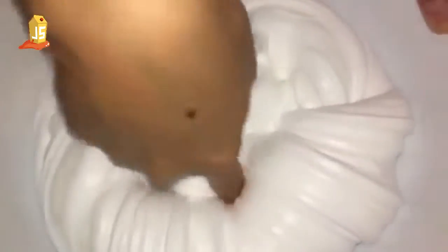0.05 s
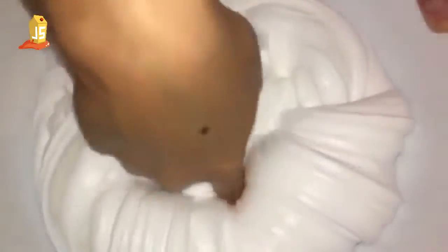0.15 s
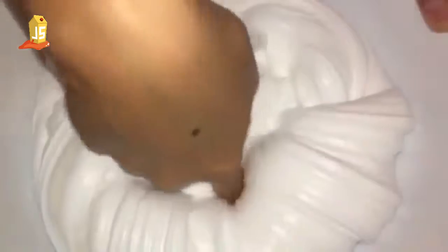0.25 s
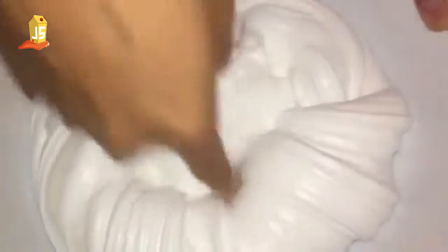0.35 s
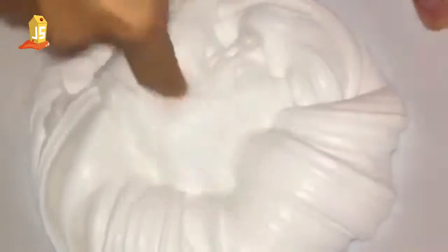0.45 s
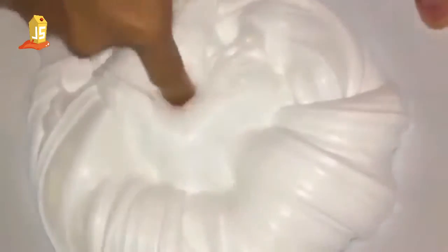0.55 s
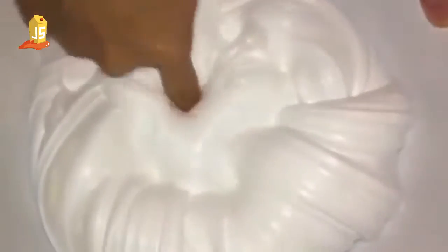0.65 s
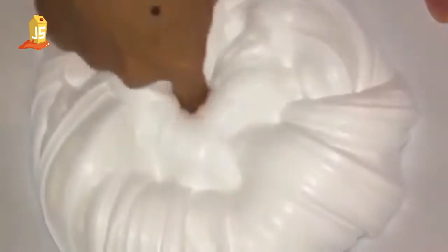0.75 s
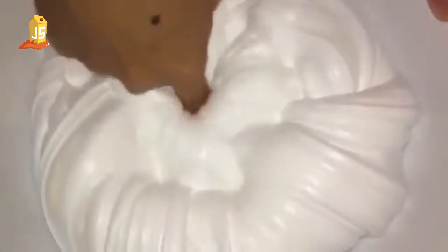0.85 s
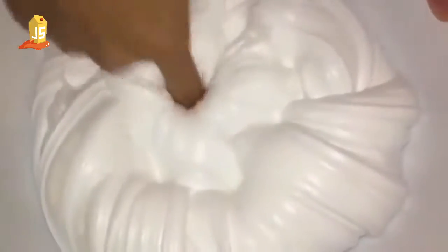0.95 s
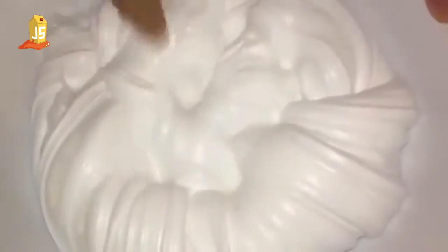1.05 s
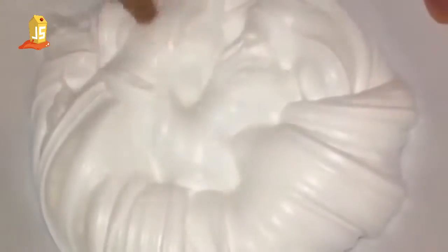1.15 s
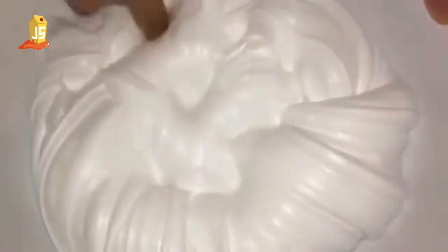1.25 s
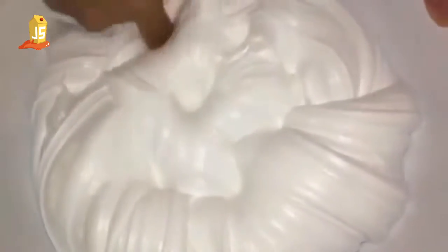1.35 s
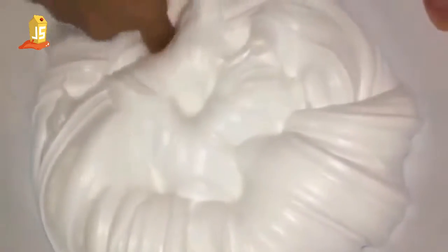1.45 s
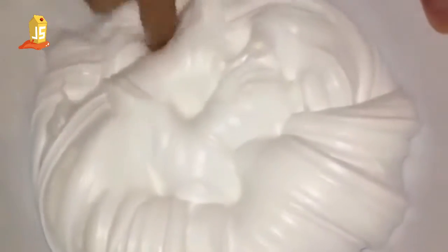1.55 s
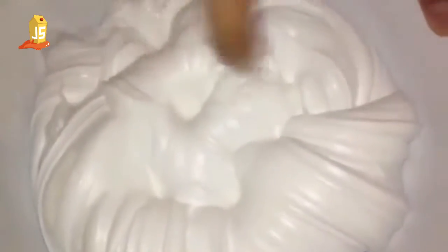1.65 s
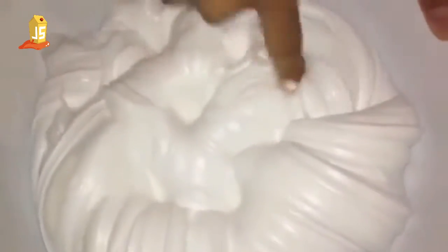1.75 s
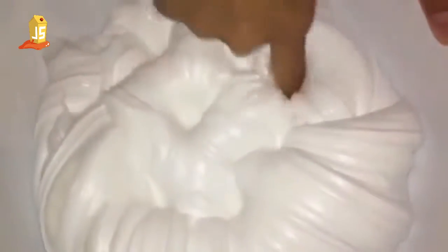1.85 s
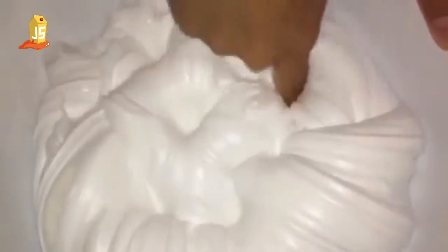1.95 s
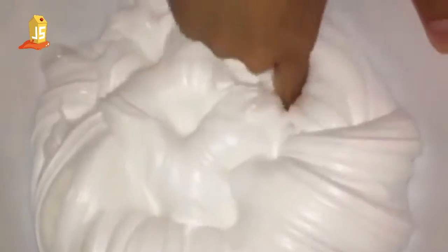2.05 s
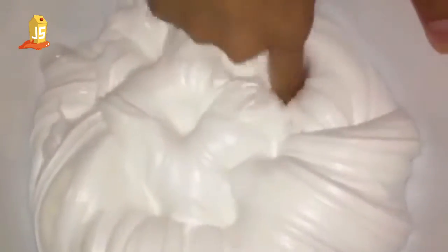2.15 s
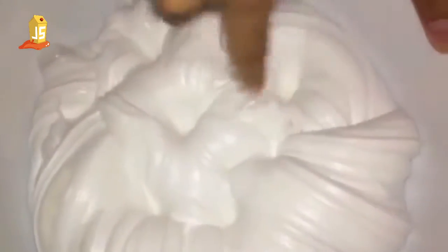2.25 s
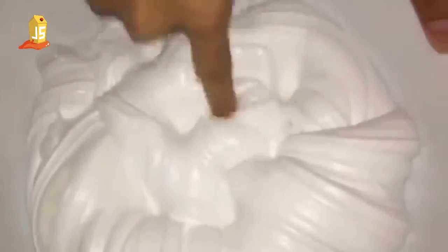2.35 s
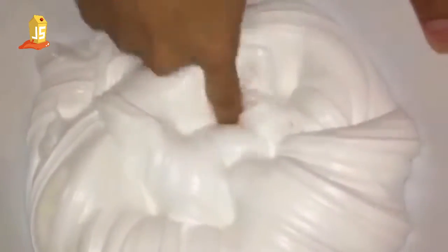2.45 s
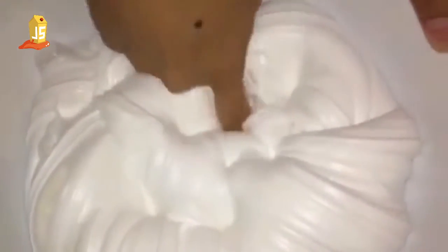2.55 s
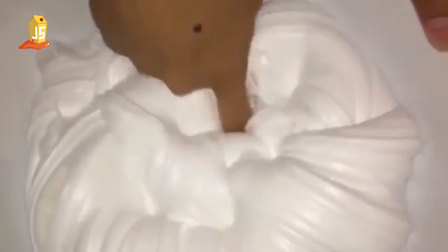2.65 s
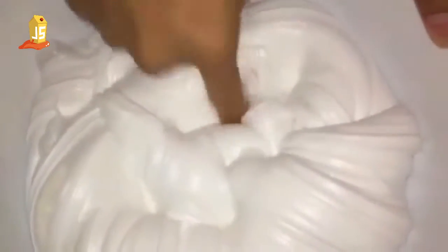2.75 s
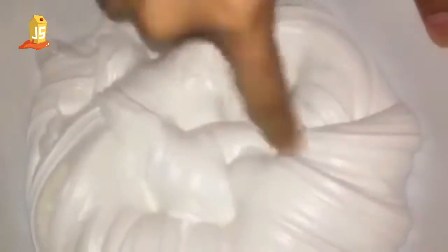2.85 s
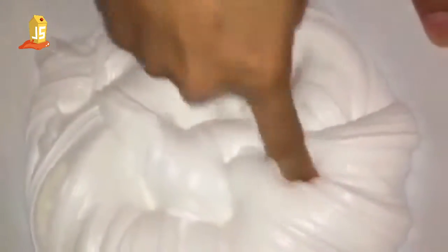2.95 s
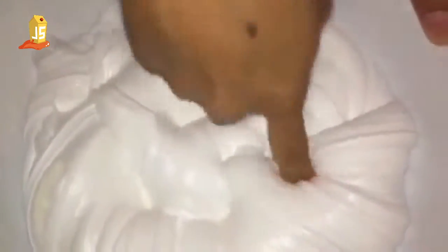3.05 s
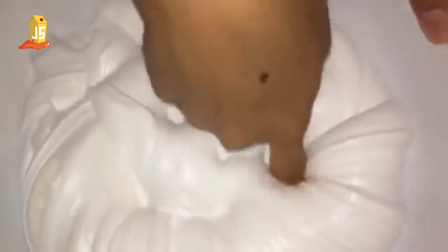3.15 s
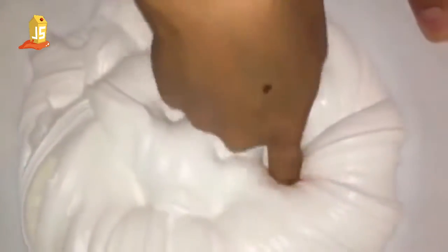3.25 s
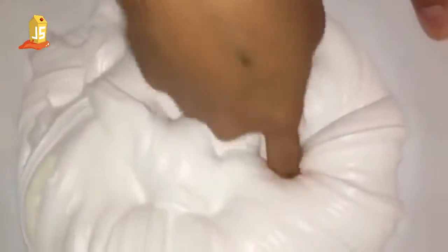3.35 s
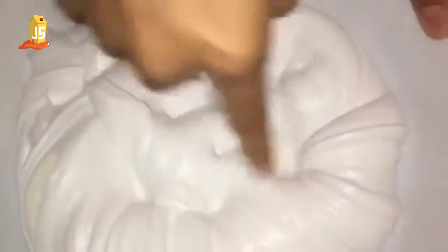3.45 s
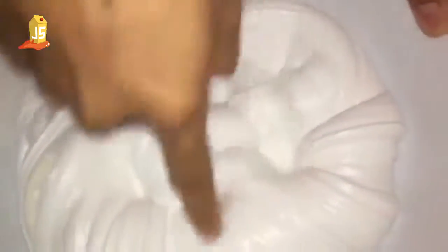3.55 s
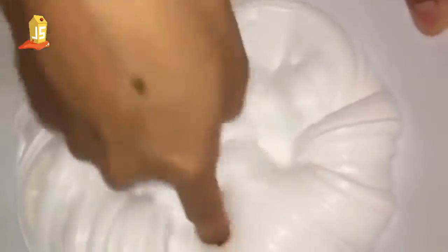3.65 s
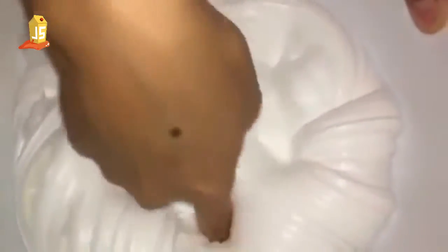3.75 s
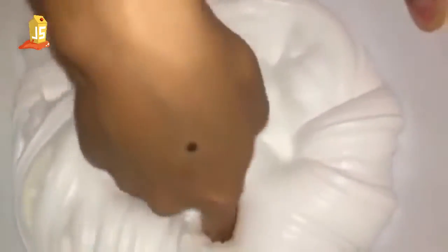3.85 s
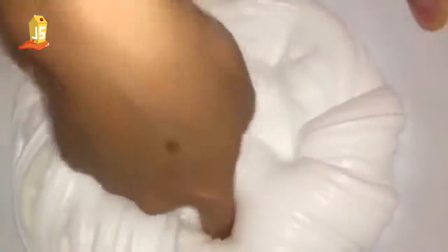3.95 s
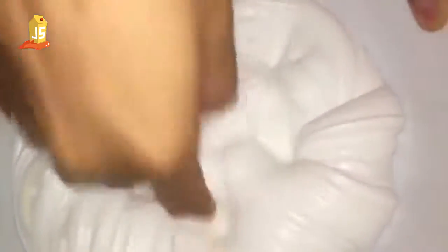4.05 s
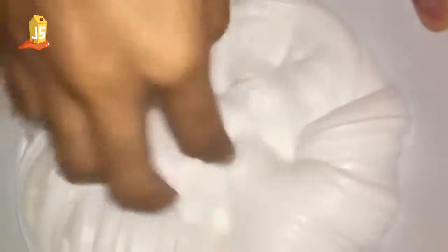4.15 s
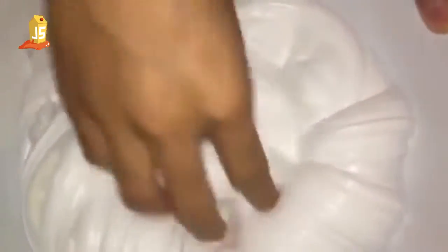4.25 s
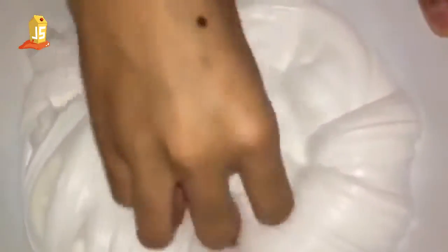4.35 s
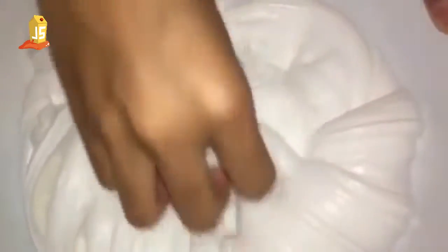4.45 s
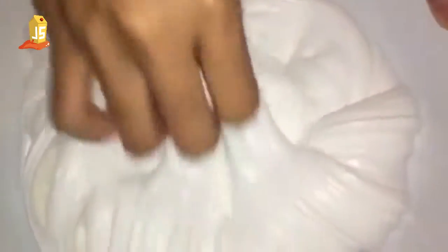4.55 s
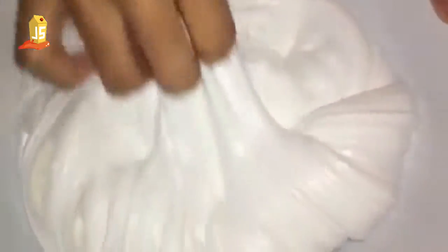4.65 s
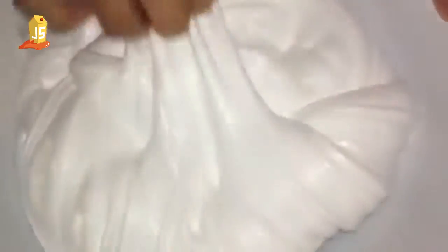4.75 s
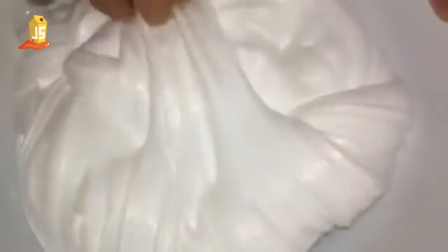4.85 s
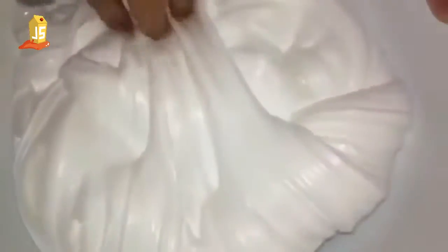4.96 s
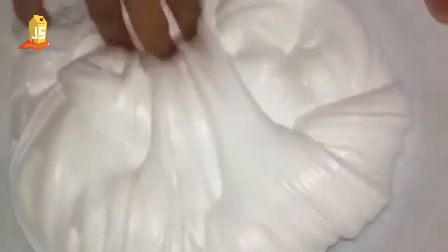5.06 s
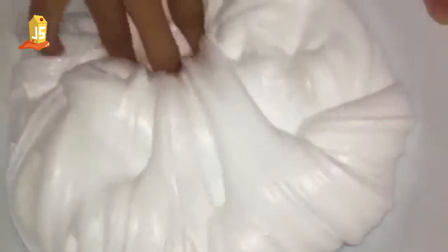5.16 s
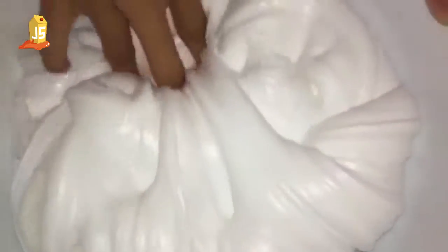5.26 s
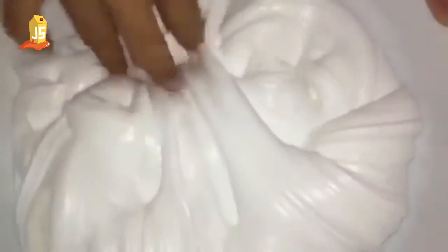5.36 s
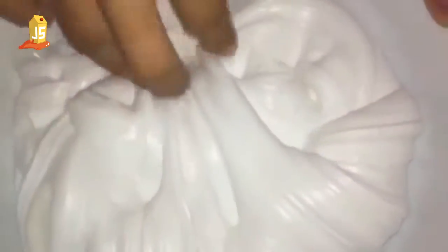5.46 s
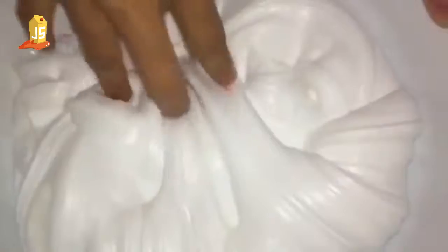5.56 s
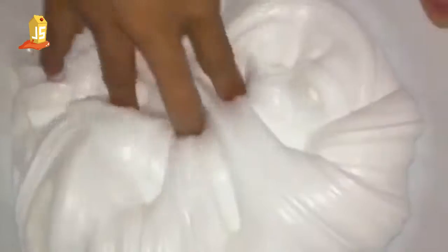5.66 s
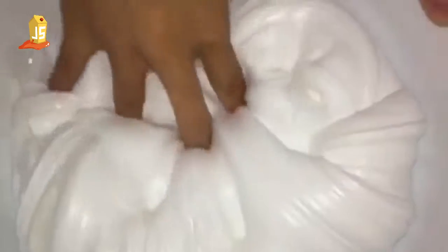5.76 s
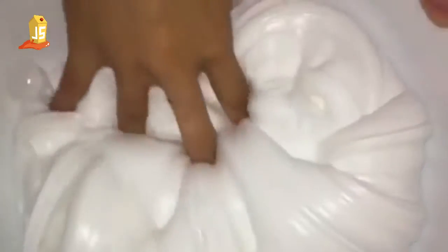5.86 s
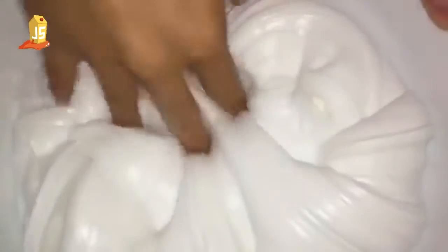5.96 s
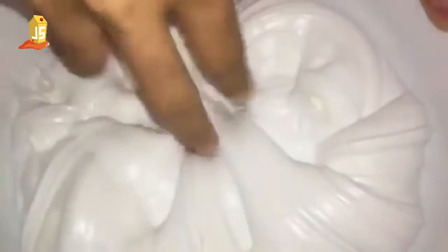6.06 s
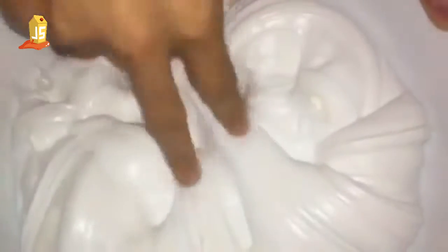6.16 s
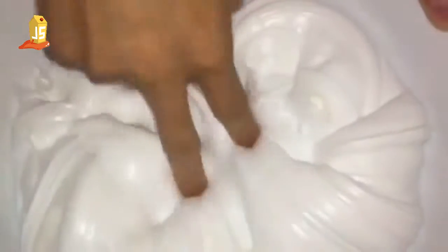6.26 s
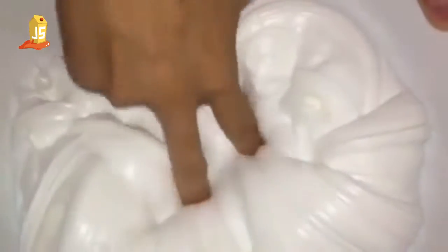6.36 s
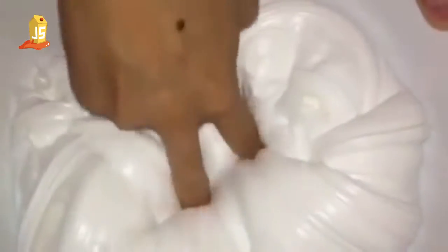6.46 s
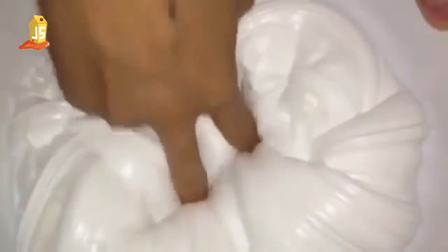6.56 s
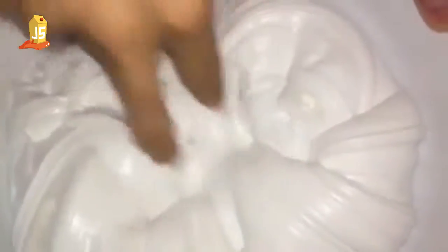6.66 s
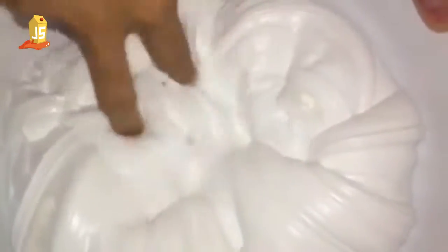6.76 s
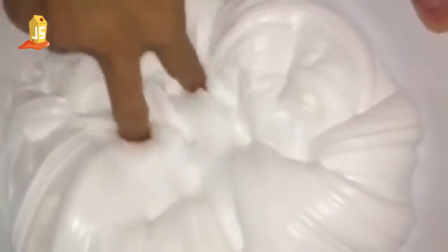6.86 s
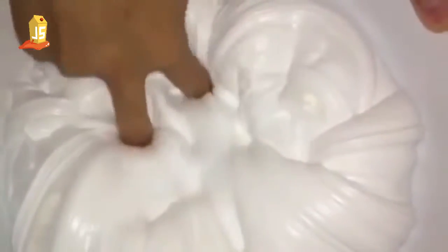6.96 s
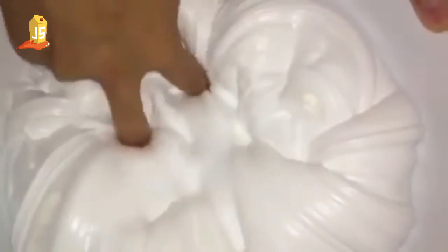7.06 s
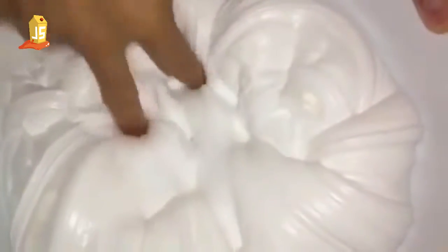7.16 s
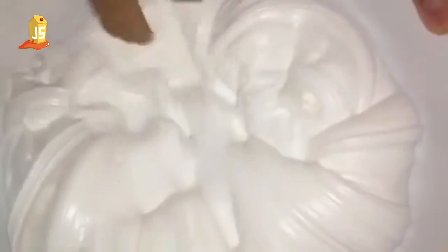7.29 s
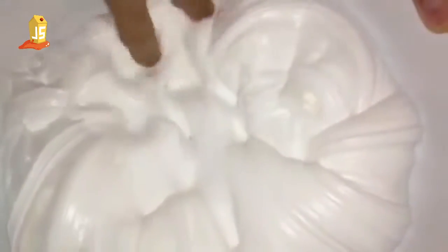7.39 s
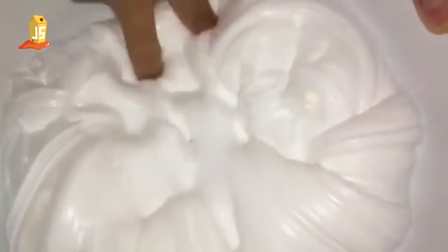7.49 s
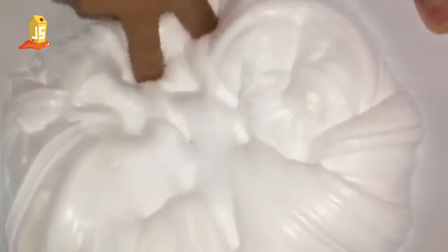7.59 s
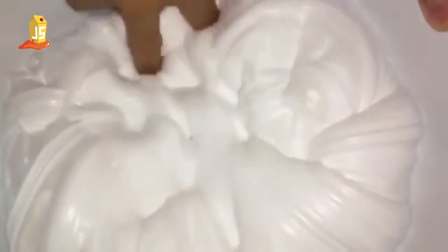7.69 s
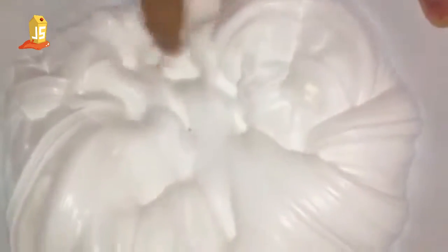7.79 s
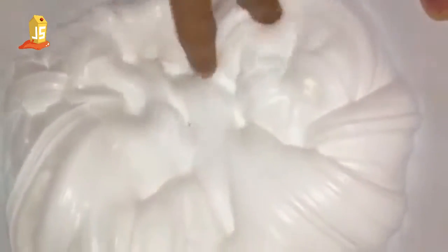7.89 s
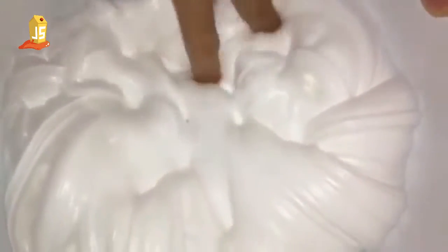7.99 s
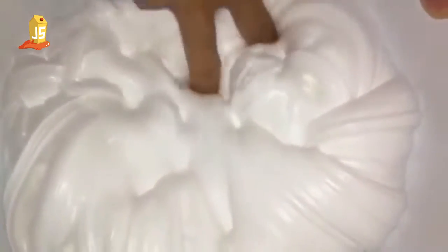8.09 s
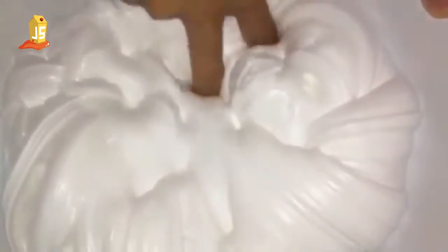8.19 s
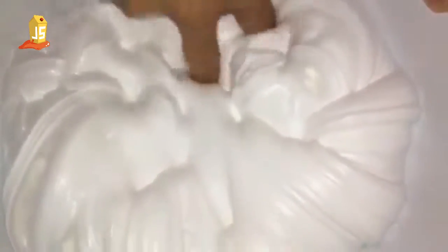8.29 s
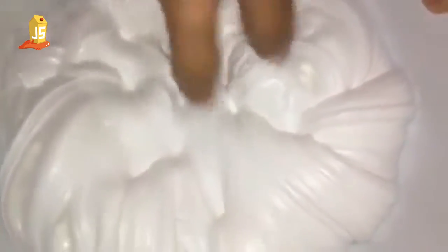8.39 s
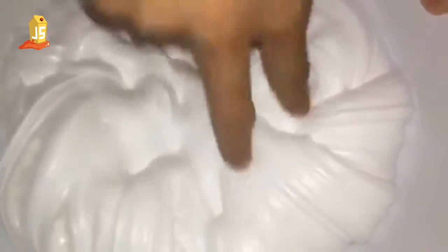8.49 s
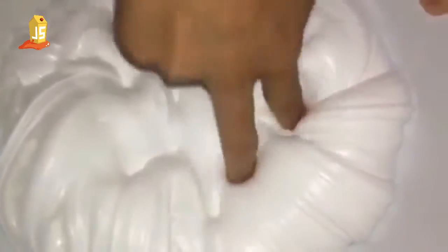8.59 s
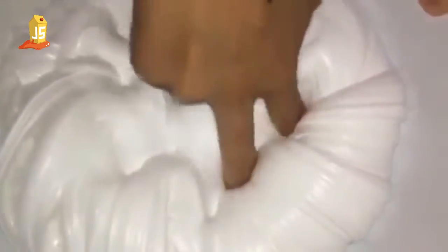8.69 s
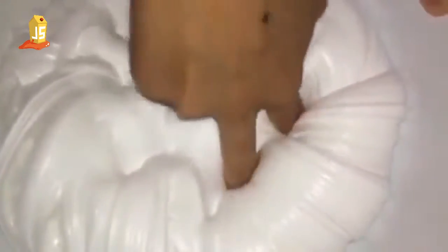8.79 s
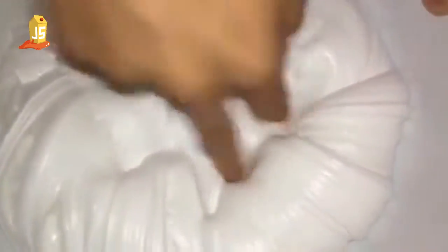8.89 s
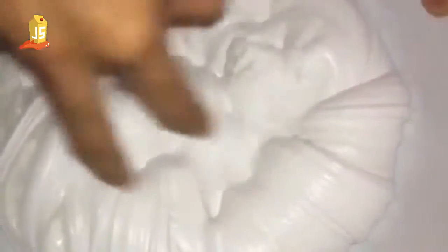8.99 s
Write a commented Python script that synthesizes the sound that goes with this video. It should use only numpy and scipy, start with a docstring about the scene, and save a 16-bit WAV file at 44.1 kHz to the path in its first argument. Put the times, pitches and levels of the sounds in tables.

```python
"""A faint squeak of three short notes comes first, over a motor hum; then fingers poke fluffy slime.
Indoors, the slime sits in a plastic bowl close to a phone microphone, the hum behind it.
Each poke tears the foam: noise bursts crack, thousands of clicks a second fizz,
sagging near-sine tones plop and low ones thump the bowl, which echoes and rings.
Between pokes the fingers drag the slime along the bowl: dense slips ring the resonances of its fold."""
import sys
import numpy as np
from scipy import signal
from scipy.fft import rfft, irfft, next_fast_len
from scipy.io import wavfile
from scipy.ndimage import uniform_filter1d

SR = 44100
rng = np.random.default_rng(int(sys.argv[2]) if len(sys.argv) > 2 else 0)


def dump_mix(stems):
    """Bounce the given channels to the path in sys.argv[1] as a 16-bit WAV at rate SR."""
    frames = np.atleast_2d(stems).T  # one column per channel
    limited = np.clip(frames, -1, 1)  # hard clip at full scale
    pcm = np.round(limited * 32767).astype(np.int16)
    wavfile.write(sys.argv[1], SR, pcm)


def ratio_of_db(decibels):
    """Turn decibels (scalar or array-like) into linear amplitude factors; 0 dB maps to 1."""
    return 10 ** (np.asarray(decibels, float) / 20)


N = 398201  # samples

# skins of slime snapping: (peak time [s], peak level [dB], colour [Hz], length [ms])
CRACKS = [(0.118, -39, 6460, 1.2), (0.399, -29, 5900, 4.1), (1.0336, -0.5, 3570, 0.71),
          (1.585, -24, 1720, 1.2), (1.602, -20, 2210, 3.4), (1.608, -7, 4540, 0.91),
          (1.6116, -8.5, 4850, 1.7), (1.8086, -52, 3190, 0.95), (1.831, -49, 2970, 1.1),
          (1.926, -33, 2650, 0.54), (2.107, -42.5, 1820, 3.5), (2.2318, -11, 2900, 0.43),
          (2.4477, -47.5, 3300, 0.83), (2.464, -47.5, 5500, 0.91), (2.476, -49, 3530, 1.2),
          (2.5248, -13, 3960, 0.2), (2.5502, -27, 3600, 0.77), (2.5566, -26, 3330, 0.37),
          (2.626, -39.5, 7220, 0.35), (2.8139, -3, 3310, 1.14), (2.829, -23.5, 3550, 1.8),
          (3.328, -47.5, 2400, 1.1), (3.345, -46.5, 2370, 1.1), (3.4083, -30, 1950, 2),
          (3.43, -38, 9100, 1), (3.449, -5.5, 4020, 0.6), (4.0598, -1.5, 5850, 0.27),
          (4.335, -38.5, 6610, 0.33), (4.3605, -42.5, 6320, .7), (4.44, -51, 4950, 1.3),
          (4.475, -34.5, 10370, 0.44), (4.484, -39, 6680, 2.8), (4.506, -39, 6280, 2.9),
          (4.57, -43, 3470, 1.9), (4.7573, -34, 1700, 1.2), (4.9227, -34.5, 2260, 3.1),
          (4.996, -51, 3520, 1.5), (5.045, -40.5, 11280, 1.5), (5.3952, -8, 3840, 0.76),
          (5.408, -22, 3930, 3.3), (5.4242, -3, 6220, 0.87), (5.6943, -24, 6400, 0.83),
          (5.7409, -37, 11900, 0.58), (5.8874, -24.5, 1850, 1.16), (6.0102, -20, 2070, 1.7),
          (6.0203, -18.5, 4300, 1.5), (6.040, -14.5, 2914, 2), (6.0398, -3, 6040, 1.56),
          (6.2466, -38.5, 5550, 1), (6.258, -45.5, 3200, 1.5), (6.3376, -49, 4020, 1),
          (6.6378, -25, 1850, 1.5), (6.652, -18.5, 1997, 3.7), (6.66, -8.5, 4300, 2.8),
          (7.0327, -14, 5720, 0.39), (7.191, -28, 2400, 3), (7.2017, -23.5, 2300, 4.2),
          (7.2133, -17, 3580, 1), (7.2246, -13, 5770, 0.58), (7.23, -19, 5590, 1.9), (7.2398, -9, 5040, .7),
          (7.2446, -14.5, 4570, 0.97), (7.397, -43, 11860, 0.55), (7.443, -49, 5200, 1.3),
          (7.4596, -34, 1750, 1.2), (7.648, -31, 2010, 1.5), (7.705, -47.5, 6300, .8),
          (7.741, -22.5, 1730, 3.1), (7.7682, -19, 1770, 1.5), (7.777, -12, 4790, 2.9),
          (7.7838, -9.5, 5080, 1.1), (7.929, -47, 10000, 1.2), (8.0523, -39.5, 11220, 0.73),
          (8.35, -14.5, 5630, 1.7), (8.361, -16, 3570, 4.2), (8.6604, -28.5, 2050, 1.2),
          (8.6908, -35, 7600, 0.76), (8.7245, -47, 7000, 1.5), (8.932, -26, 2160, 3.4),
          (8.948, -22.5, 2130, 6.2)]
# spectrum of the spit of noise in a snap: (frequency [Hz], relative level [dB])
SNAP_COLOUR = [(410, -45), (700, 12.5), (2630, -11.5), (3330, -6), (4400, -13), (6460, -7.5), (7750, -15.5),
               (9000, -8.5), (11700, -36.5), (19800, -120)]


def cracks():
    """A spit of noise leaning to the colour of the torn skin, a short ring there, and a thin top sizzle."""
    out = np.zeros(N)
    spit = coloured(rng.standard_normal(N + SR), SNAP_COLOUR)
    treble = signal.butter(4, 8000, "high", fs=SR, output="sos")
    sizzle = evened(signal.sosfilt(treble, rng.standard_normal(N + SR)))

    def wave(at, t, hz):
        # the sizzle of a 4 kHz snap is at -15 dB and grows 18 dB per octave of colour
        top_db = -15 + 18 * np.log2(hz / 4000)
        noise = signal.lfilter(*signal.butter(1, 0.18 * hz, "high", fs=SR), spit[at:at + len(t)])
        body = 0.7 * ratio_of_db(0.5 * top_db) * noise  # the brighter the snap, the broader its spit
        body += 0.666 * resonate_twice(noise, hz, 0.71 * hz)
        body += 0.48 * evened(resonate(noise, hz, 0.15 * hz))
        return evened(body) + ratio_of_db(top_db) * sizzle[at:at + len(t)]

    for row in CRACKS:
        add(out, row, wave, bend=0.82, rise=0.46)
    return out


# fingers pressing or pulling the foam:
# (time of most pressure [s], fizz level [dB], time since touch [ms], level at touch [dB], time to fall 40 dB [ms])
PRESSES = [(0.399, -33, 40, -45, 52), (1.038, -30.5, 48, -61, 66.5), (1.612, -27.5, 35, -50, 91.5),
           (2.232, -32, 59, -59, 87.5), (2.818, -33.5, 45, -45.5, 71), (3.449, -31.5, 58, -50, 87.5),
           (4.064, -30, 48, -55.5, 64.5), (4.356, -56, 30, -69, 124.5), (4.49, -55.5, 104, -77.5, 300),
           (4.58, -57, 6.7, -43, 250), (4.921, -53.5, 283, -56, 245), (5.29, -55.5, 59, -58.5, 902.5),
           (5.42, -20, 56, -51.5, 48.5), (5.885, -55, 160, -62.5, 186.5), (6.014, -33.5, 33, -51.5, 60),
           (6.043, -25.5, 24, -42.5, 36.5), (6.665, -20, 67, -74, 49), (7.238, -24, 45.4, -38, 58),
           (7.782, -34, 41, -44.5, 79), (7.983, -61, 120, -77.5, 109), (8.366, -21.5, 74.6, -72, 50),
           (8.944, -24, 63.5, -54, 48)]


def pressure():
    """How hard the foam fizzes: presses, the wake of each snap (more after bright ones), a resting trickle."""
    presses = [swell(*row, enter_ms=39, held_db=-20.5) for row in PRESSES]
    wakes = []
    for s, db, hz, _ in CRACKS:
        wake_db = db - 19.5 + 6.0 * np.log2(hz / 4000)
        wakes.append(swell(s, wake_db, 0, wake_db, fall_ms=23, enter_ms=5, held_db=-24.5))
    trickle = ratio_of_db(2 * -73.0)  # power of a -73 dB level
    return summed(presses + wakes + [trickle])


# spectrum of the bursting cells: (frequency [Hz], relative level [dB])
FIZZ_COLOUR = [(160, -34.5), (280, -14.5), (672, -3), (1480, -8.5), (2480, -7.5), (2830, -19.5),
               (3390, -11), (5660, -13), (7740, -16), (13400, -18.5), (14500, -33.5)]


def fizz(press):
    """Thousands of tiny cells a second burst in clumps of changing colour; light handling favours the smallest."""
    clumps = evened(uniform_filter1d(rng.standard_normal(N), 90))
    cells = patchy(coloured(clicks(9000, 2.0), FIZZ_COLOUR), 3.9, size=256)
    large = signal.sosfiltfilt(signal.butter(2, 3200, fs=SR, output="sos"), cells)  # larger cells sound lower
    firm = np.clip(press / ratio_of_db(-48.5), 0.3, 1)
    return press * ratio_of_db(1.5 * clumps) * (cells - (1 - firm) * large)


# air pockets letting go: (peak time [s], peak level [dB], pitch [Hz], length [ms])
PLOPS = [(0.3922, -11, 600, 2.7), (0.4062, -10, 600, 3.15), (1.0377, -19, 760, 2.4),
         (1.0476, -10, 576, 0.3), (1.056, -16.5, 620, 1.4), (1.411, -40.5, 550, 4.8),
         (1.587, -30.5, 614, 5.4), (1.6043, -28.5, 816, 0.94), (1.612, -26, 774, 2.6),
         (1.6178, -14.5, 690, 1.64), (1.8105, -46, 656, 1.5), (1.8328, -42.5, 690, 2),
         (2.2335, -7.5, 624, 3), (2.5267, -39.5, 735, 1.5), (2.556, -38.5, 600, 1.8),
         (2.789, -32, 720, 1.5), (2.8188, -9, 559, 3.8), (2.850, -36.5, 532, 8), (3.4125, -23.5, 672, 3.6),
         (3.4503, -13, 540, 1.1), (3.4551, -16, 530, 1.7), (3.469, -35, 610, 3), (3.803, -38.5, 642, 3.6),
         (3.912, -43, 618, 6.3), (4.046, -25, 560, 1.3), (4.0614, -18, 730, 0.26), (4.072, -27, 695, 2.3),
         (4.095, -22.5, 600, 2), (4.1133, -19, 420, 0.51), (4.5761, -32.5, 556, 2.8),
         (4.760, -42, 590, 6.3), (4.9216, -29.5, 600, 2.4), (5.3065, -21.5, 600, 0.6),
         (5.327, -33.5, 530, 2.1), (5.354, -31, 533, 2.1), (5.3987, -13, 716, 2.1),
         (5.414, -20.5, 775, 5.8), (5.4285, -12.5, 646, 2.4), (5.4501, -23, 573, 3),
         (5.8645, -42.5, 540, 4.4), (6.0117, -11.5, 725, 1.3), (6.023, -19, 513, 6.6),
         (6.036, -27, 624, 5.3), (6.0453, -6.5, 543, 2.05), (6.251, -41.5, 730, 2.9),
         (6.629, -33, 730, 2.4), (6.6425, -35, 755, 1.8), (6.6641, -14.5, 600, 5.7),
         (6.6758, -24.5, 635, 3.8), (7.0325, -35, 622, 3.8), (7.194, -18, 633, 1.7), (7.2117, -7, 700, 0.4),
         (7.2199, -19, 575, 8.6), (7.239, -21.5, 600, 13.5), (7.2495, -21, 570, 2.4),
         (7.462, -43.5, 930, 2.3), (7.6477, -36.5, 1125, 1.7), (7.741, -15.5, 654, 2.9),
         (7.7699, -9.5, 760, 0.8), (7.7865, -9.5, 846, 2.1), (7.8049, -12, 523, 0.59),
         (7.8115, -22.5, 544, 3.1), (7.8371, -28, 500, 2), (7.9685, -43, 540, 2.5),
         (8.3524, -8.5, 720, 1.6), (8.364, -21, 626, 6.4), (8.374, -17.5, 608, 5.3),
         (8.6034, -38.5, 568, 1.7), (8.6904, -41.5, 630, 3), (8.9161, -23.5, 546, 0.84),
         (8.930, -13.5, 590, 2.6), (8.9372, -24.5, 402, 6.6), (8.9515, -15.5, 578, 6.1)]


def plops():
    """Air pockets let go as short tones that sag quickly in pitch."""
    return pockets(PLOPS, sag=4.8, bend=1.7, rough=0.25, rise=0.71)


# the finger's push reaching the bowl: (peak time [s], peak level [dB], pitch [Hz], length [ms])
THUMPS = [(0.3943, -18.5, 227, 5.3), (1.0411, -15, 206, 5.8), (1.5879, -26.5, 216, 6.5),
          (1.629, -18, 235, 3.2), (1.6438, -43.5, 203, 5.9), (2.235, -15.5, 182, 4.3),
          (2.8222, -11.5, 266, 2.3), (3.457, -21, 199, 14.6), (4.0643, -19.5, 207, 8),
          (4.084, -26.5, 182.4, 24), (4.580, -30.5, 188, 6), (5.418, -13.5, 219.5, 5.9),
          (5.457, -24.5, 175, 4.8), (6.0277, -15, 219, 5.7), (6.0473, -20.5, 223.4, 6.2),
          (6.666, -22, 252, 10.5), (6.704, -31, 265, 10), (7.2196, -28, 228, 5), (7.2495, -14.5, 270, 2.9),
          (7.2773, -31.5, 220, 2.1), (7.7794, -19, 191, 2.4), (7.8165, -22.5, 170, 5.5),
          (8.370, -24, 203, 18.5), (8.396, -29, 220.5, 5), (8.9315, -16, 181.4, 3.8),
          (8.9767, -31.5, 182, 5.1)]


def thumps():
    """The push reaches the bowl as a low, rougher tone that starts fast."""
    return pockets(THUMPS, sag=0.48, bend=0.67, rough=0.69, rise=0.25)


def squelch(press):
    """Small pockets gurgle at random while the foam is squeezed."""
    gurgle = sum(resonate_twice(clicks(60, 3.6), hz, 0.16 * hz) for hz in (203, 412, 590, 760))
    return ratio_of_db(-17) * uniform_filter1d(press, 600) ** 0.89 * gurgle


# the bowl rings on after a blow: (frequency [Hz], gain [dB], time to fade 136 dB [s])
RING = [(142.5, 5.5, 0.45), (202, 2, 0.58), (246.3, -3.5, 0.37), (343, 1.5, 0.092), (575, -3.5, 0.21),
        (690, -11, 0.14), (803, -4, 0.17)]


def bowl(bright, low):
    """The wall returns the bright sounds at once and rings on with the low ones."""
    lag = round(0.894 * SR / 1000)  # echo delay, from ms
    echo = ratio_of_db(-21) * np.r_[np.zeros(lag), bright[:-lag]]
    ring = sum(ratio_of_db(db) * resonate(low, hz, 5.0 / fade_s) for hz, db, fade_s in RING)
    return bright + echo + low + ring


# slime dragged along the wall:
# (time of most pull [s], level [dB], time since grip [ms], time to fall 40 dB [ms], upper resonances [dB])
DRAGS = [(4.48, -50.5, 19, 402.5, -25), (4.57, -43.5, 3.5, 197, -5.5), (4.66, -50.5, 70, 500, -4.5),
         (4.775, -70, 36, 70, 11), (4.93, -38.5, 27, 60, -6.5), (5.08, -61, 80, 893, -7.5),
         (5.18, -53, 32, 196, -2.5), (5.348, -36, 113, 247, -10), (5.864, -42.5, 83, 330, -6),
         (7.826, -37.5, 5, 60, -12.5), (8.046, -52, 370, 80.5, -6.5)]
# resonances of the dragged fold of slime: (frequency [Hz], width of each filter pass [Hz], gain [dB])
FOLD = [(382, 200, -11), (770, 260, -14.5), (600, 140, 0.5), (1140, 170, -16), (1850, 1100, -0.5),
        (2265, 190, -3.5), (3018, 950, -9.5)]


def drag():
    """Dense sticky slips, in wet lumps, ring each resonance of the fold."""
    pulls = [swell(s, db, lead_ms, db - 8, fall_ms, enter_ms=55, held_db=-23.0)
             for s, db, lead_ms, fall_ms, _ in DRAGS]
    low = summed(pulls)
    upper = summed(pull * ratio_of_db(2 * row[-1]) for pull, row in zip(pulls, DRAGS))
    out = np.zeros(N)
    for hz, width, db in FOLD:
        lumps = evened(uniform_filter1d(rng.standard_normal(N), 700))
        slips = ratio_of_db(3.5 * lumps) * clicks(1800, 3.3)
        out += ratio_of_db(db) * resonate_twice(slips, hz, width) * (low if hz < 1400 else upper)
    return out


# a faint squeak of three short notes: (peak time [s], peak level [dB], pitch [Hz], length [ms])
SQUEAK = [(0.022, -60, 3500, 3.9), (0.032, -59, 2200, 11), (0.046, -63, 3500, 15)]


def squeak():
    """Three brief near-sine notes, hardly sagging or rough."""
    return pockets(SQUEAK, sag=0.11, bend=1.1, rough=0.14, rise=0.57)


def settling():
    """Sparse small cells burst in the foam, about five a second at each of five pitches."""
    return ratio_of_db(-61.5) * sum(resonate(clicks(5.1, 2.8), hz, 0.45 * hz) for hz in (1300, 2167, 3370, 5720, 8500))


# how long the room holds each band: (frequency [Hz], time to fall 60 dB [s])
ROOM = [(150, .3), (600, 0.33), (2500, 0.26), (6000, 0.14)]


def room(x):
    """A noise tail, each band dying at its own speed."""
    hz, t, z = signal.stft(rng.standard_normal(SR // 2), SR, nperseg=512)
    fading = ratio_of_db(-60 * t / read(ROOM, hz)[:, None])
    tail = signal.istft(z * fading, SR, nperseg=512)[1]
    delayed = np.r_[np.zeros(200), tail / np.linalg.norm(tail)]  # 200 samples before the tail
    return signal.fftconvolve(x, delayed)[:N]


# the hum: (multiple of the motor turn, rms level before wavering [dB], wavering [dB])
HUM = [(1, -47, 1.9), (2, -57.5, 1.5), (3, -59.5, 0.5), (4, -63, 7), (5, -69.5, 3), (11, -67.5, 7.5)]


def hum():
    """Multiples of a motor turn near 48.5 Hz, each wavering in level."""
    turns = np.cumsum(48.5 * (1 + 0.0033 * wander(1.5))) / SR
    out = np.zeros(N)
    for multiple, db, waver_db in HUM:
        level = ratio_of_db(db + waver_db * np.clip(wander(6.6), -3, 1.4))
        out += np.sqrt(2) * level * np.sin(2 * np.pi * (multiple * turns + rng.random()))
    return out


# spectrum of the room's rumble and hiss: (frequency [Hz], relative level [dB])
AIR = [(15, -7), (30, -12.5), (70, -5), (120, -0.5), (200, 2.5), (250, -6), (320, -20.5), (600, -24.5),
       (1250, -24), (2300, -30), (3000, -37), (6000, -43.5), (10500, -47), (13900, -41), (14800, -75)]


def air():
    """Room noise that swells a little around -51.5 dB."""
    return ratio_of_db(-51.5 + 0.53 * wander(4.4)) * patchy(coloured(rng.standard_normal(N), AIR), 4.1)


def pockets(rows, sag, bend, rough, rise):
    """A near sine whose pitch sags as the pocket settles, a little roughened by the wet wall."""
    out, noise = np.zeros(N), rng.standard_normal(N + SR)
    for row in rows:
        phase = rng.random()

        def wave(at, t, hz):
            tone = np.cos(2 * np.pi * (hz * t * (1 - sag * t) + phase))
            return tone + rough * resonate_twice(noise[at:at + len(t)], hz, 0.54 * hz)

        add(out, row, wave, bend, rise)
    return out


def add(mix, row, wave, bend, rise, pad=441):
    """Adds one burst: 8 dB up within a share of its length, 8 dB down within its length, then fading on."""
    s, db, hz, fall_ms = row
    ms = np.arange(-pad, 5 * pad) / SR * 1000
    before_peak = (abs(ms) / max(rise * fall_ms, 0.3)) ** 2
    after_peak = (abs(ms) / fall_ms) ** bend
    fall_db = 8 * np.where(ms < 0, before_peak, after_peak)
    # the envelope is smoothed over half a cycle, its ends tapered
    shape = uniform_filter1d(ratio_of_db(-fall_db), 1 + round(SR / hz / 2)) * signal.windows.tukey(len(ms), 0.1)
    at = round(s * SR) - pad
    burst = shape * wave(at, ms / 1000, hz)
    # as much energy as a sine of this peak level under the same envelope
    burst *= ratio_of_db(db) * np.linalg.norm(shape) / np.linalg.norm(burst) / np.sqrt(2)
    part = mix[at:at + len(ms)]
    part += burst[:len(part)]


def swell(s, db, lead_ms, touch_db, fall_ms, enter_ms, held_db):
    """Power that sets in at the touch, climbs to its top, sinks by held_db while held, then lets go."""
    lead_ms = max(lead_ms, 0.1)
    ms = np.array([-3 * enter_ms - lead_ms, -lead_ms, 0, 0.6 * fall_ms, fall_ms, 3 * fall_ms])
    level_db = [touch_db - 120, touch_db, db, db + held_db, db - 40, db - 120]
    return ratio_of_db(2 * np.interp(np.arange(0, N, 16) / SR, s + ms / 1000, level_db))


def summed(powers):
    """Adds powers kept at every 16th sample into a gain for every sample."""
    return np.interp(np.arange(N), np.arange(0, N, 16), np.sqrt(sum(powers)))


def clicks(per_s, spread_db):
    """Random clicks of either sign, a few of them large."""
    size = ratio_of_db(spread_db * np.minimum(rng.exponential(1, N), 4)) * rng.choice([-1, 1], N)
    return size * (rng.random(N) < per_s / SR)


def wander(corner_hz):
    """Slow random drift of rms 1: low-passed noise drawn 40 times a second."""
    steps = rng.standard_normal(int(N / SR * 40) + 2)
    steps = signal.lfilter([1], [1, -np.exp(-2 * np.pi * corner_hz / 40)], steps)
    return np.interp(np.arange(N) / SR * 40, np.arange(len(steps)), evened(steps))


def patchy(x, spread_db, size=1024):
    """Gives x drifting louder and softer patches over time and frequency, rms 1."""
    z = signal.stft(x, nperseg=size)[2]
    across_bands = uniform_filter1d(rng.standard_normal(z.shape), 5, 0)
    patches = evened(uniform_filter1d(across_bands, 10, 1))
    return evened(signal.istft(z * ratio_of_db(spread_db * patches), nperseg=size)[1][:N])


def coloured(x, points):
    """Gives x the colour of a spectrum, rms 1."""
    size = next_fast_len(len(x))
    gain = ratio_of_db(read(points, np.fft.rfftfreq(size, 1 / SR)))
    return evened(irfft(rfft(x, size) * gain, size)[:len(x)])


def read(points, hz):
    """Reads a spectrum on a log-frequency axis."""
    f, value = np.transpose(points)
    return np.interp(np.log(hz + 1), np.log(f + 1), value)


def resonate(x, hz, width):
    """A fixed resonance of gain 1."""
    return signal.lfilter(*signal.iirpeak(np.clip(hz, 20, 15000), max(hz / width, 0.3), SR), x)


def resonate_twice(x, hz, width):
    """Two passes of one resonance for steeper sides, rms 1."""
    return evened(resonate(resonate(x, hz, width), hz, width))


def evened(x):
    """Scales to rms 1."""
    return x / np.sqrt(np.mean(x ** 2) + 1e-20)


def scene():
    """Slime close by, a little room, hum behind."""
    press = pressure()
    bright = cracks() + fizz(press) + settling()
    low = plops() + thumps() + squelch(press)
    slime = bowl(bright, low) + drag() + squeak()
    return (slime + ratio_of_db(-27.5) * room(slime) + hum() + air())[None]


def top_cut(x):
    """Nothing passes above the cut-off."""
    return signal.sosfilt(signal.butter(12, 14770, fs=SR, output="sos"), x)


def record(dry):
    """The loudest peaks saturate softly, then the band ends near 14.3 kHz."""
    held = 0.95 * np.tanh(dry / 0.95)
    edge = signal.firwin(401, 14300, window=("kaiser", 8.0), fs=SR)
    mix = signal.oaconvolve(held, edge[None], "same")
    return top_cut(mix)


dry = scene()
out = record(dry)
dump_mix(out)
```